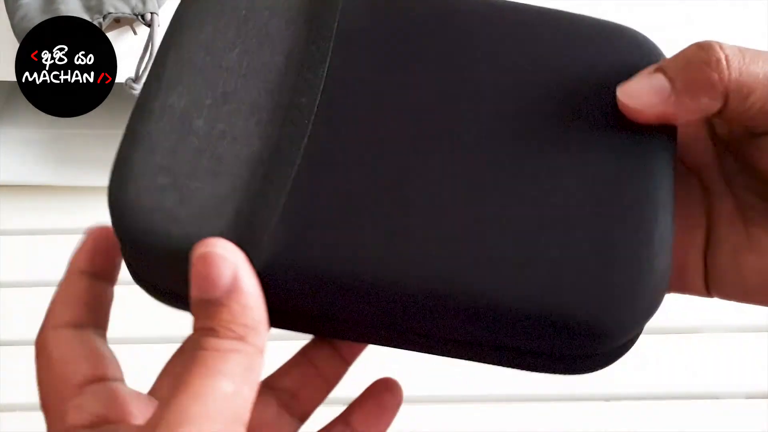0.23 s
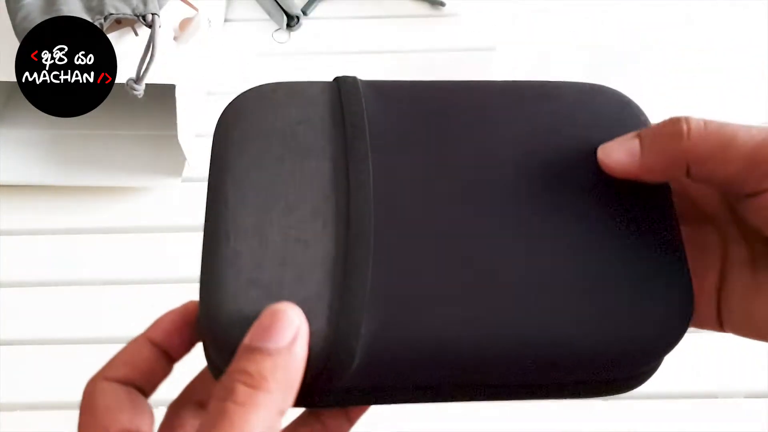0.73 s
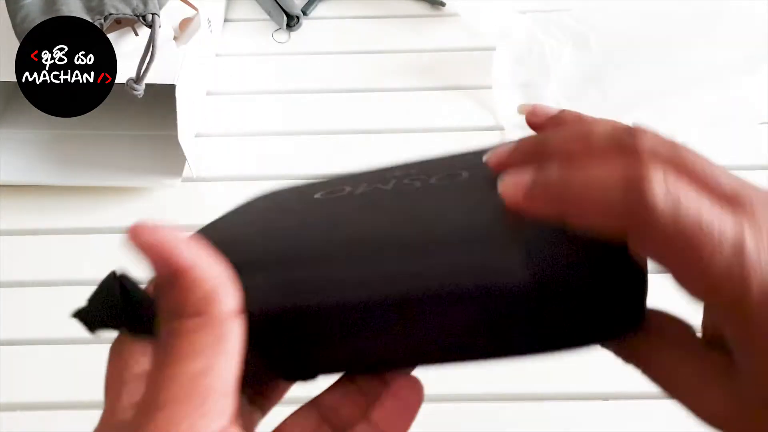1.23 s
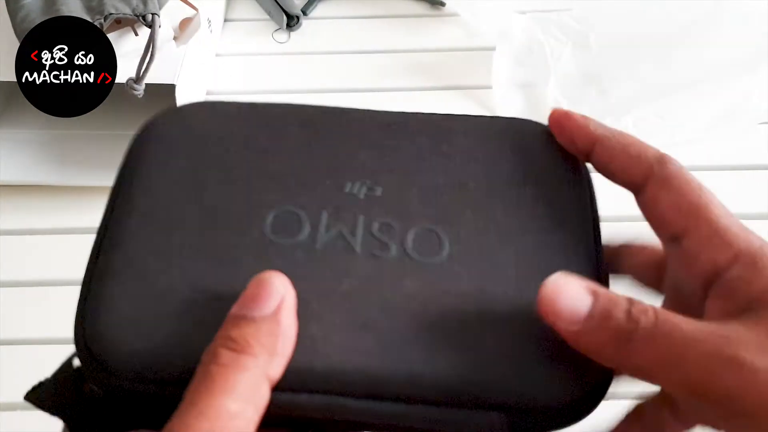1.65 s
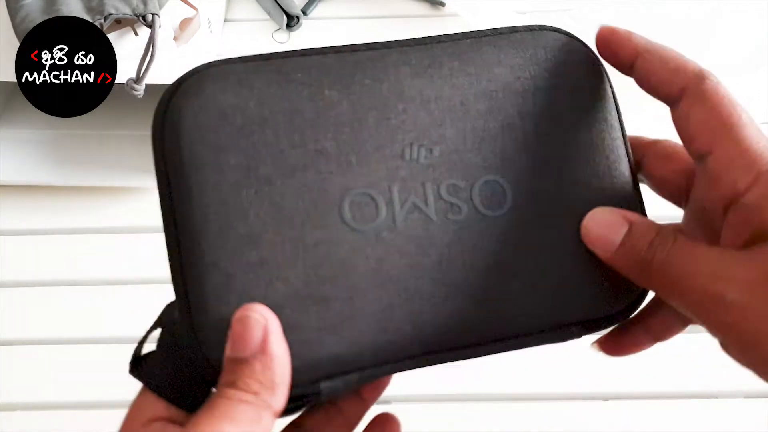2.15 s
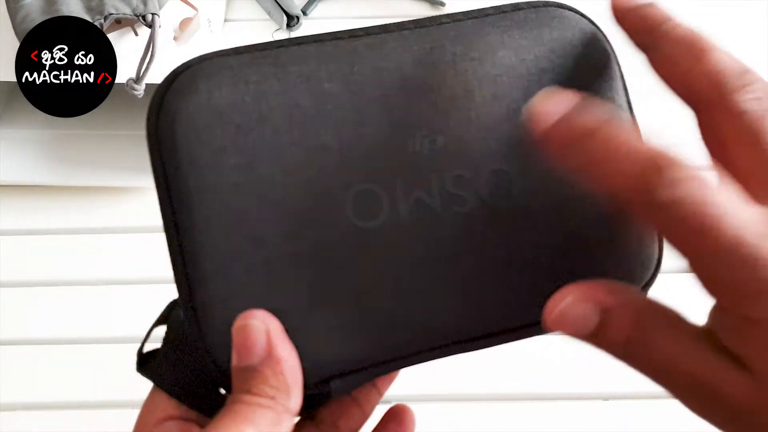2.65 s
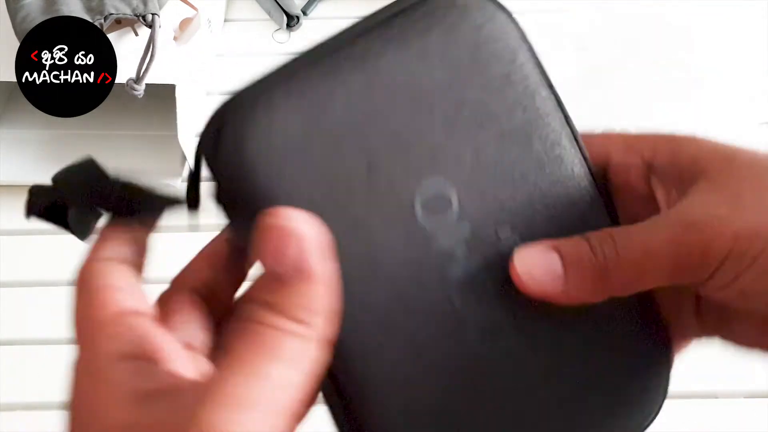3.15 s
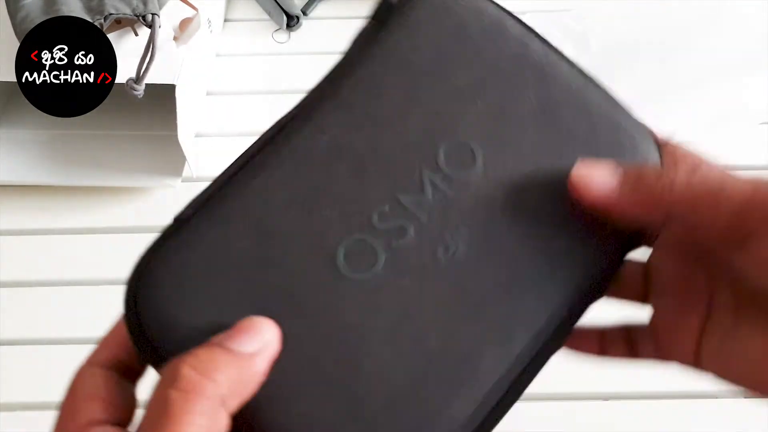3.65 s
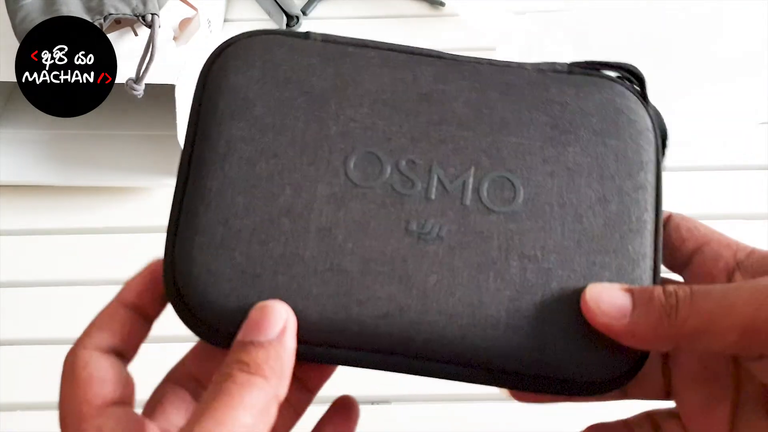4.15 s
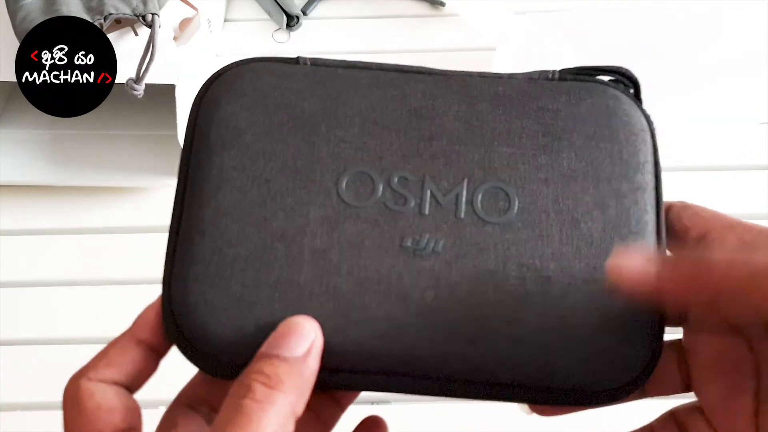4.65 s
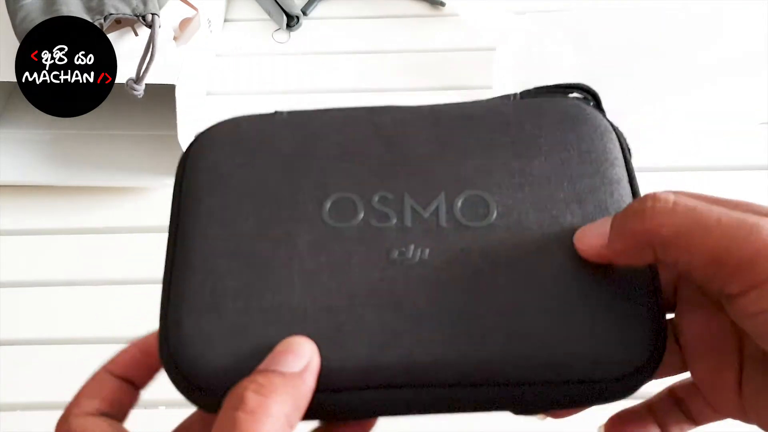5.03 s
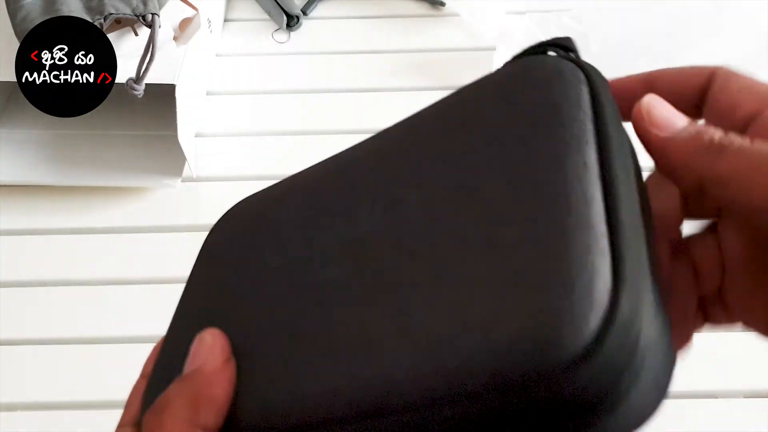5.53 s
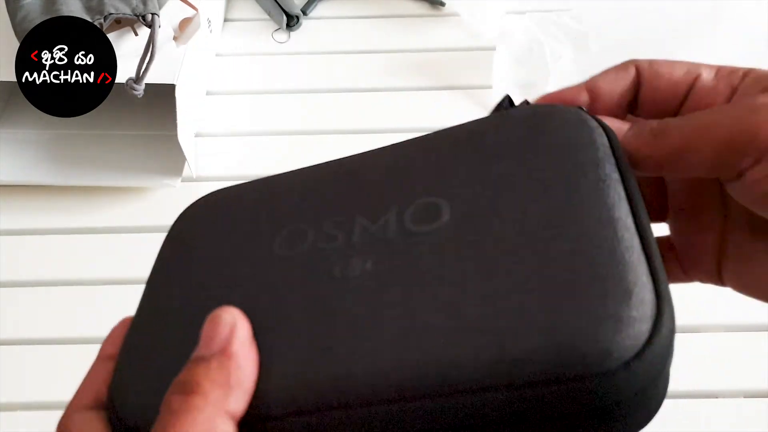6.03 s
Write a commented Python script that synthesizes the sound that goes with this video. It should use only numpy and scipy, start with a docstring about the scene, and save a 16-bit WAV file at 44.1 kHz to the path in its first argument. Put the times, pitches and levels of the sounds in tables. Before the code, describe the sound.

Hands handle a fabric-covered hard case close by and slightly left, in a small room with short reflections and a faint low rumble. In the first half second, the zipper pull and fingertips tick quickly on the shell, with soft bumps and a rasp of skin on fabric. Short rubbing strokes and scattered ticks continue, with a hissy swish around 1.5 seconds. At 2.5 and 2.7 seconds a finger raps the hollow lid, the loudest sounds, each with a slight zipper rattle. The pull clatters against the shell at about 3.3 seconds, amid more swishes and clicks that thin out after 4 seconds. A third, softer rap lands at 4.9 seconds. Light rubbing, dull bumps and small ticks follow. From about 6 seconds the zipper slider creeps very faintly over a few teeth for a moment.

```python
"""Handling a hard carrying case

Two hands turn a fabric-covered case in a small room, which answers over a low rumble.
Skin rasps over the weave in short strokes, and the air pocket under a sliding hand rings.
The zipper pull and fingertips tick on the shell, a finger raps the hollow lid three times,
and at last the zipper slider starts to creep over its teeth."""
import sys
import numpy as np
from scipy import signal
from scipy.fft import rfft, irfft, next_fast_len
from scipy.io import wavfile
from scipy.ndimage import map_coordinates

SR = 44100
rng = np.random.default_rng(int(sys.argv[2]) if len(sys.argv) > 2 else 0)


def int16_out(signal):
    """Quantize to a 16-bit WAV file."""
    q = np.round(np.clip(np.atleast_2d(signal).T, -1, 1) * 32767)
    wavfile.write(sys.argv[1], SR, q.astype(np.int16))


N = 277389


def amp(db):
    """Decibels to gain."""
    return 10 ** (np.asarray(db) / 20)


def unit_rms(x):
    """Scale to rms 1."""
    return x / np.sqrt(np.mean(x ** 2) + 1e-20)


def along(points, hz):
    """Interpolate (freq_hz, value) points on a log axis."""
    freq_hz, values = np.transpose(points)
    return np.interp(np.log(hz + 1), np.log(freq_hz + 1), values)


def wobble(knots_per_s):
    """Smooth random curve."""
    knots = rng.standard_normal(int(N * knots_per_s / SR) + 4)
    return map_coordinates(knots, [np.arange(N) * knots_per_s / SR])


def filtered(x, response):
    """Apply a complex frequency response."""
    n = x.shape[-1]
    size = next_fast_len(n + SR // 8)
    return irfft(rfft(x, size) * response(np.fft.rfftfreq(size, 1 / SR)), size)[..., :n]


def causal(spectrum_db):
    """Minimum-phase impulse response of a spectrum."""
    cepstrum = irfft(np.log(amp(spectrum_db)))
    half = len(cepstrum) // 2
    cepstrum[1:half] *= 2
    cepstrum[half + 1:] = 0
    return irfft(np.exp(rfft(cepstrum)))


def modes(table, hz):
    """Complex response of summed resonances."""
    return sum(amp(db) * 1j * hz * width_hz / (mode_hz ** 2 - hz ** 2 + 1j * hz * width_hz)
               for mode_hz, width_hz, db in table)


def add(track, start_s, sound):
    """Mix a sound into a track."""
    part = track[..., max(round(start_s * SR), 0):][..., :sound.shape[-1]]
    part += sound[..., :part.shape[-1]]


def pan(x, left_db):
    """Tilt left by a frequency-dependent level difference."""
    return filtered(x, lambda hz: amp(np.array([[1], [-1]]) * along(left_db, hz) / 2))


# Left-right likeness: freq_hz, correlation
COHERENCE = [(100, 1), (350, 0.84), (1000, 0.24), (2500, 0.056), (6000, 0.069), (14000, .1)]
def spread(pair):
    """Two unrelated signals to stereo: alike in the bass, apart in the treble."""
    def mid_side_gains(hz):
        angle = np.arccos(np.clip(along(COHERENCE, hz), -1, 1)) / 2
        return np.array([np.cos(angle), np.sin(angle)])
    mid, side = filtered(pair, mid_side_gains)
    return np.array([mid + side, mid - side])


def contact(force, impulse_response):
    """Stereo response to a pair of force signals."""
    return spread(signal.fftconvolve(force, impulse_response[None], axes=1))


def grainy_noise(spectrum, grain_db):
    """Stereo noise of tiny, uneven grains."""
    grains = rng.standard_normal((2, N)) * amp(grain_db * wobble(900))
    pair = spread(filtered(grains, lambda hz: amp(along(spectrum, hz))))
    return pair / np.std(pair.mean(0))


# Room at rest: freq_hz, density_db
RUMBLE_SPECTRUM = [(22, -37.5), (36, -18), (48, 3), (62, 1), (78, -13.5), (97, -0.5), (125, -7), (200, -8),
                   (500, -20), (1250, -34.5), (2400, -37.5), (4200, -44), (8300, -50), (12500, -42.5)]
def background(level_db=-57.5, left_db=((100, 5.8), (12000, 2.2))):
    """Steady room noise with a low rumble."""
    return pan(amp(level_db) * grainy_noise(RUMBLE_SPECTRUM, grain_db=1.0), left_db)


# Room decay: freq_hz, t60_s
ROOM_DECAY = [(150, 0.75), (400, 0.51), (1200, 0.47), (4000, 0.43), (12000, 0.4)]
def room_tail(build_s=0.0017, wall_s=0.034, wall_db=6, wall_width_s=0.0053):
    """Reflections build quickly, swell as the far wall replies, and die band by band."""
    hz, t, bands = signal.stft(rng.standard_normal((2, SR // 2)), SR, nperseg=256)
    swell_db = wall_db * np.exp(-((t - wall_s) / wall_width_s) ** 2)
    decay_db = 60 * t / along(ROOM_DECAY, hz)[:, None]
    _, tail = signal.istft(bands * amp(swell_db - decay_db), SR, nperseg=256)
    build = 1 - np.exp(-np.arange(tail.shape[1]) / SR / build_s)
    tail = spread(tail * build)
    return tail / np.linalg.norm(tail[0])


def room(x):
    """Small-room reverberation, with a fresh random tail every 0.2 s to keep it smooth."""
    wet, step = np.zeros((2, N)), SR // 5
    for n in range(0, N, step):
        mono = x[:, n:n + step].mean(0)
        add(wet, n / SR, signal.fftconvolve(mono[None], room_tail(), axes=1))
    # freq_hz, gain_db
    wet_gain = [(200, -12.5), (430, -9.5), (600, -9.5), (900, -11), (1400, -9), (3000, -2), (10000, -3)]
    return filtered(wet, lambda hz: amp(along(wet_gain, hz)))


# Slider travel: time_s, teeth_per_s, level_db
SLIDER_TRAVEL = [(5.99, 130, -95), (6.03, 230, -73), (6.07, 280, -66.5), (6.11, 500, -64),
                 (6.16, 140, -69.5), (6.21, 39, -81.5)]
# Tooth resonances: freq_hz, width_hz, gain_db
TOOTH_MODES = [(3110, 230, 3), (5500, 1300, -3.5)]
def zipper(rate_jitter_db=5.8, tooth_decay_db=25):
    """The slider creeps; each tooth it parts gives a tiny scratch."""
    t = np.arange(N) / SR
    time_s, teeth_per_s, level_db = np.transpose(SLIDER_TRAVEL)
    rate_hz = np.interp(t, time_s, teeth_per_s) * amp(rate_jitter_db * wobble(50))
    tooth_phase = np.cumsum(rate_hz) / SR % 1
    scratches = amp(-tooth_decay_db * tooth_phase) * rng.standard_normal((2, N))
    ring = unit_rms(spread(filtered(scratches, lambda hz: modes(TOOTH_MODES, hz))))
    moving = (t > time_s[0]) & (t < time_s[-1])
    return moving * amp(np.interp(t, time_s, level_db)) * ring


def air_mode(phase_rad, width_hz):
    """Stereo noise in one resonance that follows a running phase."""
    noise = rng.standard_normal((4, SR // 2))
    band = filtered(noise, lambda hz: 1 / (1 + 1j * hz / width_hz) ** 2)[:, :len(phase_rad)]
    return unit_rms(((band[:2] + 1j * band[2:]) * np.exp(1j * phase_rad)).real)


# Hand passes: narrowest_s, approach_s, top_hz, level_db
HAND_PASSES = [(1.562, 0.093, 1623, -48.5), (3.27, 0.015, 914, -57), (3.33, 0.064, 1270, -50),
               (3.645, 0.081, 1707, -58.5), (3.77, 0.065, 792, -63.5), (3.98, 0.099, 834, -62),
               (5.168, .04, 822, -56.5), (5.245, 0.041, 1880, -64), (5.37, .03, 472, -50.5)]
def air_pockets(gap_octaves=1.25, gap_db=11.5, leave_ratio=0.92, speed_up_db=5.5,
                width_ratio=0.13, upper_ratio=1.8, upper_db=-5, upper_widening=4.7):
    """Air under an accelerating hand rings in two broad modes that rise and grow as the gap closes."""
    out, t = np.zeros((2, N)), np.arange(N) / SR
    for narrowest_s, approach_s, top_hz, level_db in HAND_PASSES:
        travel = (t - narrowest_s) / approach_s
        gap = np.maximum(-travel, travel / leave_ratio)
        near = gap < 1
        pitch_hz = top_hz * 2 ** (-gap_octaves * gap[near] ** 2)
        phase_rad = 2 * np.pi * np.cumsum(pitch_hz) / SR
        width_hz = width_ratio * top_hz
        lower = air_mode(phase_rad, width_hz)
        upper = amp(upper_db) * air_mode(upper_ratio * phase_rad, upper_widening * width_hz)
        gain = amp(level_db - gap_db * gap[near] + speed_up_db * travel[near])
        out[:, near] += gain * signal.windows.tukey(len(gain), 0.2) * (lower + upper)
    return out


def snags(spectrum, rate_per_s=50, scatter_db=4):
    """Threads snag the skin and let go at random, each with a tiny snap."""
    released = rng.random(N) < rate_per_s / SR
    snaps = released * amp(scatter_db * rng.uniform(-0.86, 1, N)) * rng.choice([-1, 1], N)
    colour = causal(along(spectrum, np.fft.rfftfreq(1024, 1 / SR)))
    return unit_rms(signal.fftconvolve(snaps, colour)[:N])


# Skin on the weave: start_s, attack_s, hold_s, rasp_db, hiss_db
SKIN_STROKES = [(0, 0.0027, 0.19, -54, -68), (0.168, 0.067, 0.12, -60, -71),
                (0.586, .012, 0.036, -65.5, -102), (0.829, 0.16, 0.14, -56.5, -58.5),
                (1.22, 0.043, 0.089, -68.5, -74.5), (1.405, 0.16, 0.016, -58, -54.5),
                (1.727, 0.014, 0.071, -61, -63.5), (1.87, .1, 0.035, -65, -70.5),
                (2.188, 0.038, 0.04, -77.5, -77.5), (2.917, 0.081, .115, -59.5, -70.5),
                (3.254, 0.0094, .07, -65, -70.5), (3.312, 0.017, 0.075, -54, -64.5),
                (3.387, .1, 0.024, -51.5, -59.5), (3.522, 0.078, 0.054, -56.5, -63),
                (3.708, 0.041, 0.2, -67.5, -73), (3.89, 0.1, 0.025, -67, -69.5),
                (4.067, 0.019, 0.063, -58, -76), (4.97, 0.044, 0.01, -68, -77),
                (5.125, 0.02, 0.13, -56, -69), (5.296, 0.049, 0.12, -71, -73),
                (5.582, 0.089, 0.036, -69, -78.5), (5.768, 0.027, 0.03, -73.5, -77),
                (5.966, 0.039, 0.14, -64, -70.5)]
# Weave rasp: freq_hz, density_db
RASP_SPECTRUM = [(120, -1.5), (300, 3), (480, 0.5), (800, 1), (1400, -2), (2200, -6), (3100, -10),
                 (4500, -22.5), (6500, -21), (9000, -42)]
# Fine hiss: freq_hz, density_db
HISS_SPECTRUM = [(2000, -18), (4000, -5), (5000, -4), (6500, -2.5), (8200, -11), (9500, -6.5),
                 (11200, -1.5), (13000, -10.5), (15500, -13.5)]
def strokes(onset_db=23.5, sag_db_per_s=23, release_db_per_s=178, snag_db=-6, hiss_trim_db=-0.5):
    """Skin catches on the threads: rasp and hiss swell, ease and run out with each stroke."""
    power, t = np.zeros((2, N)), np.arange(N) / SR
    for start_s, attack_s, hold_s, *levels_db in SKIN_STROKES:
        past_peak_s = t - start_s - attack_s
        swell_db = onset_db * np.minimum(past_peak_s / attack_s, 0)
        sag_db = sag_db_per_s * np.maximum(past_peak_s, 0)
        release_db = release_db_per_s * np.maximum(past_peak_s - hold_s, 0)
        power += (amp(levels_db)[:, None] * amp(swell_db - sag_db - release_db)) ** 2
    rasp_gain, hiss_gain = np.sqrt(power)
    grip_db = 1.2 * wobble(70)  # stick-slip
    rasp = grainy_noise(RASP_SPECTRUM, grain_db=3.5) + amp(snag_db) * snags(RASP_SPECTRUM)
    hiss = grainy_noise(HISS_SPECTRUM, grain_db=3.0)
    return rasp_gain * amp(grip_db) * rasp + hiss_gain * amp(hiss_trim_db + grip_db / 2) * hiss


# Zipper pull and fingertips on the case: time_s, level_db, brightness_db
TICK_HITS = [(.0545, -33, -15), (0.097, -32, -16), (.118, -31.5, -21), (.157, -35.5, -16),
             (0.258, -33.5, -32), (0.272, -25.5, -11.5), (.332, -33, -18), (0.423, -40, -10.5),
             (.444, -37.5, -22), (.999, -40.5, -7), (1.132, -33.5, -1.5), (1.243, -37.5, -16),
             (1.632, -34.5, -18), (1.747, -37.5, -24), (1.979, -43, -10), (2.7936, -34, -7.5),
             (3.084, -37.5, -13.5), (3.428, -35, -30), (3.443, -28, -29.5), (3.496, -31, -10),
             (4.103, -28.5, -57), (4.289, -42, -37), (4.386, -47, -48.5), (4.503, -49, -39),
             (4.759, -55, -3), (4.891, -27, -15), (5.277, -41, -13), (5.67, -44.5, -6), (5.796, -47.5, -6),
             (5.934, -50, -28), (5.972, -41, -2), (6.043, -43.5, -6), (6.198, -47.5, 3.5)]
# One tick: freq_hz, density_db
TICK_SPECTRUM = [(120, -31), (300, 3), (650, -0.5), (950, -4.5), (1350, -0.5), (1750, -8.5), (2200, -5.5),
                 (3200, -16.5), (4500, -19), (6500, -17), (8300, -29.5), (11000, -27.5), (15500, -40)]
def ticks(scuff_db=-19, scuff_t60_s=0.038, lead_t60_s=0.0094, rebound_s=(0.007, 0.018), rebound_db=-10.5,
          light_touch_db=-43, light_knock_db=1.5, knock_loss_db_per_db=0.7,
          treble_db=6, trim_db=-4, delay_s=0.001173):
    """Each tick scuffs, snaps and rebounds; the harder it lands, the less of it is knock."""
    lead_samples = 256
    out, t = np.zeros((2, N)), (np.arange(2048) - lead_samples) / SR
    hz = np.fft.rfftfreq(len(t), 1 / SR)
    low_shelf = 1 / (1 + (hz / 600) ** 4)
    high_shelf = 1 / (1 + (4800 / (hz + 1)) ** 6)
    scuff = amp(scuff_db - 60 * np.maximum(t / scuff_t60_s, -t / lead_t60_s))
    for time_s, level_db, brightness_db in TICK_HITS:
        force = scuff * rng.standard_normal((2, len(t)))
        force[0, lead_samples] += 1  # snap
        add(force, rng.uniform(*rebound_s), amp(rebound_db) * force)
        knock_db = light_knock_db - knock_loss_db_per_db * (level_db - light_touch_db)
        shelves_db = low_shelf * knock_db + high_shelf * (brightness_db + treble_db)
        tick = contact(force, causal(along(TICK_SPECTRUM, hz) + shelves_db))
        midband = filtered(tick.mean(0), lambda f: (f > 600) & (f < 4000))
        add(out, time_s + t[0] + delay_s, amp(level_db + trim_db) * tick / np.abs(midband).max())
    return out


# Zipper pull on the shell: freq_hz, density_db
PULL_SPECTRUM = [(200, -13), (700, -2), (1050, 9), (1400, 8), (1800, 2), (2400, -3.5), (3000, -4),
                 (4400, -8), (5100, -25), (8000, -27), (11500, -19), (15500, -29)]
def pull_clatter(start_s=3.344, level_db=-20, count=6, spacing_s=0.0058, loss_db=4.5,
                 scrape_db=-19, scrape_t60_s=0.027):
    """The swinging pull slaps the shell, then chatters ever more weakly, scraping between hits."""
    out, t = np.zeros((2, N)), np.arange(2048) / SR
    colour = causal(along(PULL_SPECTRUM, np.fft.rfftfreq(len(t), 1 / SR)))
    for k in range(count):
        force = amp(scrape_db - 60 * t / scrape_t60_s) * rng.standard_normal((2, len(t)))
        force[0, 0] += 1
        hit = contact(force, colour)
        delay_s = spacing_s * (k + rng.uniform(0, 0.2))
        add(out, start_s + delay_s, amp(level_db - loss_db * k) * hit / np.abs(hit).max())
    return out


# Hollow shell, damped by the hands: freq_hz, width_hz, gain_db
SHELL_MODES = [(242, 150, 1.5), (356, 67, 3), (672, 26, -6.5), (1025, 100, -16.5), (1164, 46, -11),
               (1407, 53, -13.5)]
def shell_knock(pitch_ratio, bass_cut_hz, contact_cut_hz):
    """One blow: little bass near the stiff rim, few upper modes under a soft finger."""
    ring = filtered(signal.unit_impulse(SR // 8), lambda hz: modes(SHELL_MODES, hz / pitch_ratio))
    ring = signal.sosfilt(signal.butter(3, bass_cut_hz, "high", fs=SR, output="sos"), ring)
    ring = signal.sosfilt(signal.butter(7, contact_cut_hz, fs=SR, output="sos"), ring)
    return -ring / np.abs(ring).max()


# Finger pads landing: start_s, level_db, pitch_ratio
PAD_BUMPS = [(.055, -37.5, 2), (0.122, -44.5, 0.79), (.14, -39.5, 0.71), (1.342, -39.5, 0.65),
             (1.683, -39, 0.68), (1.99, -44.5, 1.1), (2.793, -35, 1.3), (5.151, -35.5, 0.85),
             (5.669, -37.5, 1.63), (5.687, -39.5, 1.89)]
def finger_pads():
    """Soft pads take hold of the case with dull bumps."""
    out = np.zeros(N)
    for start_s, level_db, pitch_ratio in PAD_BUMPS:
        bump = shell_knock(pitch_ratio, bass_cut_hz=150 * pitch_ratio, contact_cut_hz=800 * pitch_ratio)
        add(out, start_s, amp(level_db) * bump)
    return out


# Raps on the lid: start_s, level_db, pitch_ratio, bass_cut_hz, contact_cut_hz, rattle_db, brightness_db
LID_RAPS = [(2.4923, -12, 0.91, 170, 1500, -0.5, -2), (2.6815, -9.5, 0.99, 161, 1380, -3.5, 5.5),
            (4.868, -17.5, 0.9, 198, 1050, -13, -5)]
# Zipper rattling on the struck shell: freq_hz, density_db
RATTLE_SPECTRUM = [(60, -16), (220, 10), (430, 28), (800, 0), (1800, 8.5), (2800, 5), (4600, 0),
                   (8000, -15), (12000, -10.5), (15500, -15.5)]
# Lingering low resonances: freq_hz, gain_db, t60_s
RING_MODES = [(241, -25.5, 0.35), (352, -28, 0.26), (394, -42.5, .3), (435, -32, 0.18), (494, -40.5, 0.5),
              (687, -42.5, 0.48)]
def raps(bounce_s=0.0041, bounce_db=-5, buzz_db=-17, buzz_t60_s=0.019, ring_rise_s=0.004):
    """A finger raps the lid: hollow knock, snap and rattle of the zipper, lingering low ring."""
    out, t = np.zeros((2, N)), np.arange(SR // 2) / SR
    hz = np.fft.rfftfreq(1024, 1 / SR)
    high_shelf = 1 / (1 + (9000 / (hz + 1)) ** 6)
    buzz = amp(buzz_db - 60 * t / buzz_t60_s)
    for start_s, level_db, pitch_ratio, bass_cut_hz, contact_cut_hz, rattle_db, brightness_db in LID_RAPS:
        add(out, start_s, amp(level_db) * shell_knock(pitch_ratio, bass_cut_hz, contact_cut_hz))
        force, bounce = buzz * rng.standard_normal((2, 2, len(t)))
        force[0, 0] += 1  # snap
        add(force, bounce_s, amp(bounce_db) * bounce)  # the zipper lands once more
        colour = causal(along(RATTLE_SPECTRUM, hz) + high_shelf * brightness_db)
        add(out, start_s, amp(level_db + rattle_db) * contact(force, colour))
        ring = sum(amp(gain_db - 60 * t / t60_s) * np.sin(2 * np.pi * (freq_hz * t + rng.random()))
                   for freq_hz, gain_db, t60_s in RING_MODES)
        add(out, start_s, amp(level_db) * ring * (1 - np.exp(-t / ring_rise_s)))
    return out


# The case lies to the left: freq_hz, left_minus_right_db
CASE_PAN = [(250, 3.5), (420, 1), (700, 10), (1300, 4.5), (4000, 7), (8000, 1), (12000, 5)]
def scene():
    """The handled case and its reflections over the background."""
    case = raps() + finger_pads() + ticks() + pull_clatter() + strokes() + air_pockets() + zipper()
    return pan(case + room(case), CASE_PAN) + background()


def record(dry, top_hz=15850):
    """Brick-wall low-pass."""
    return filtered(dry, lambda hz: hz < top_hz)


dry = scene()
out = record(dry)
int16_out(out)
```